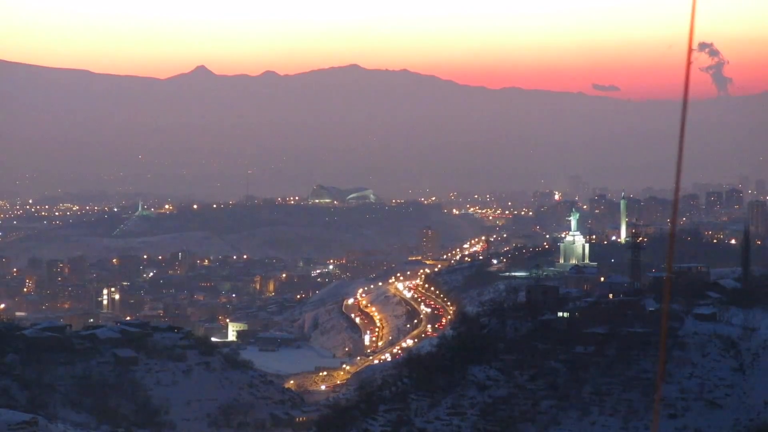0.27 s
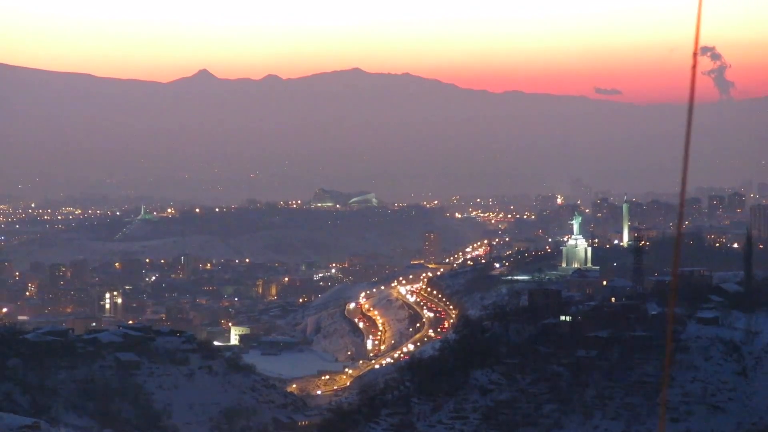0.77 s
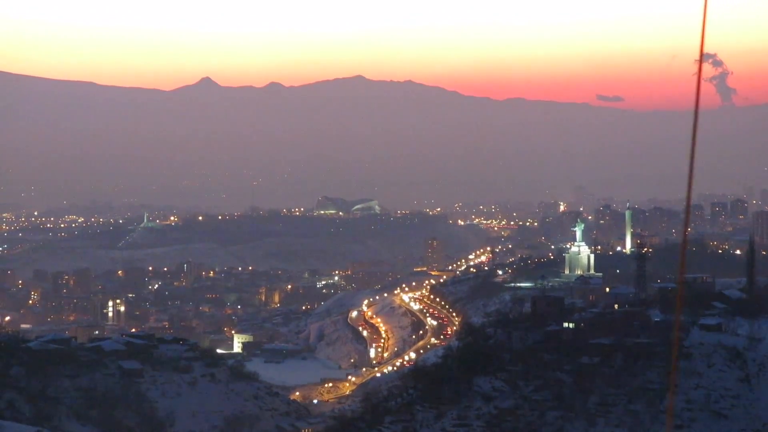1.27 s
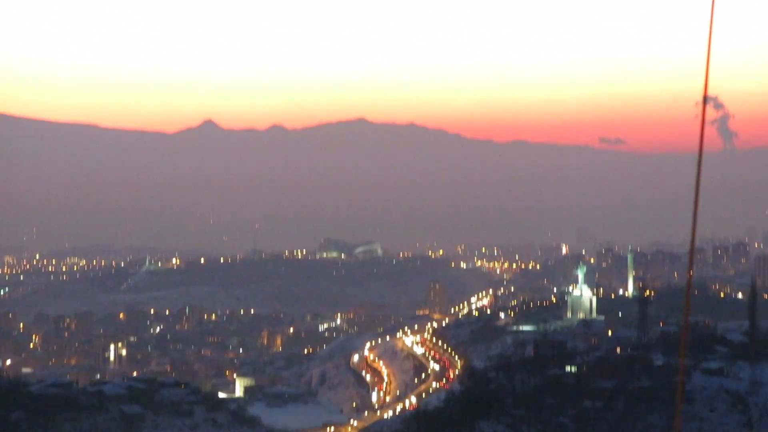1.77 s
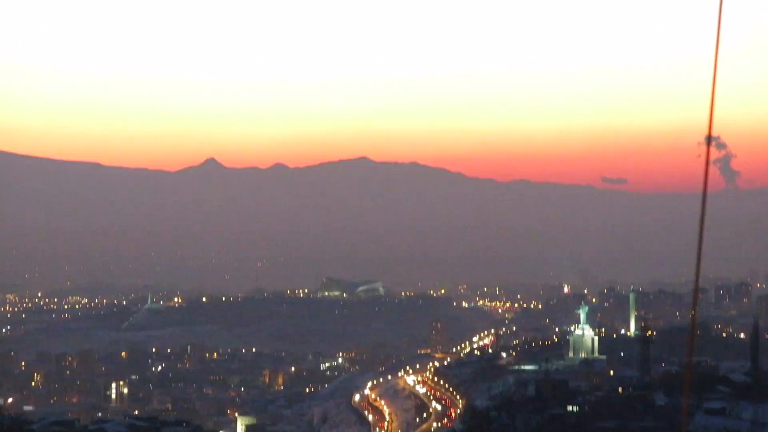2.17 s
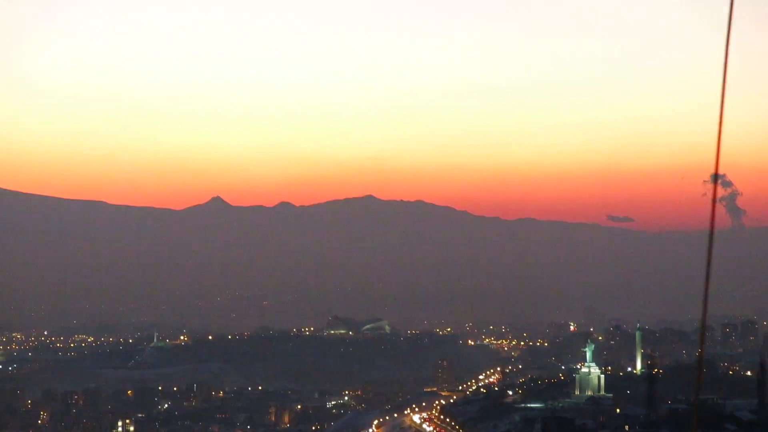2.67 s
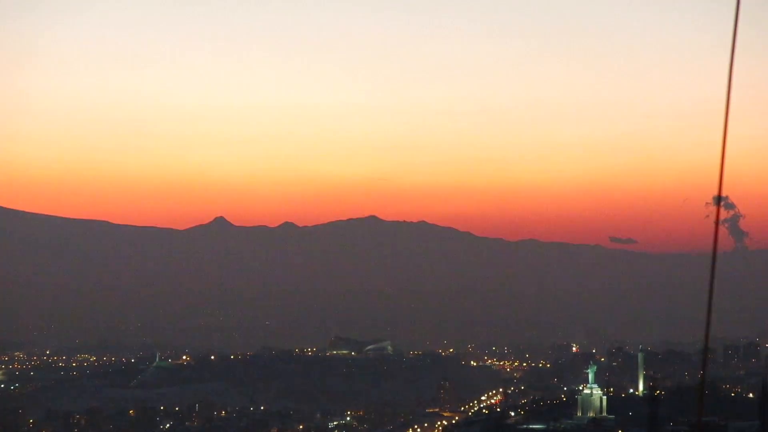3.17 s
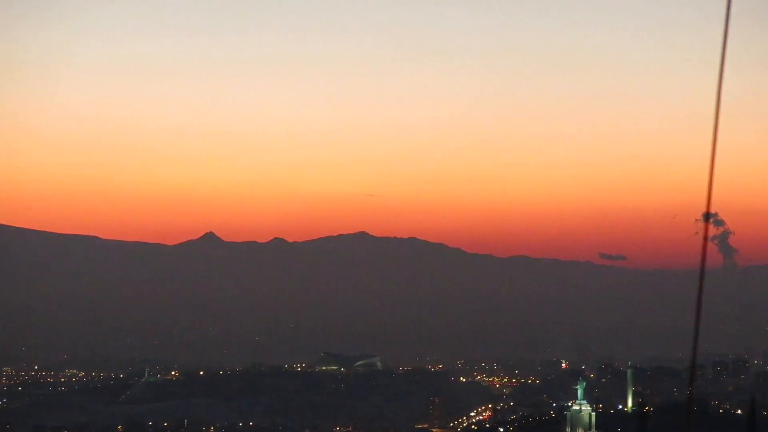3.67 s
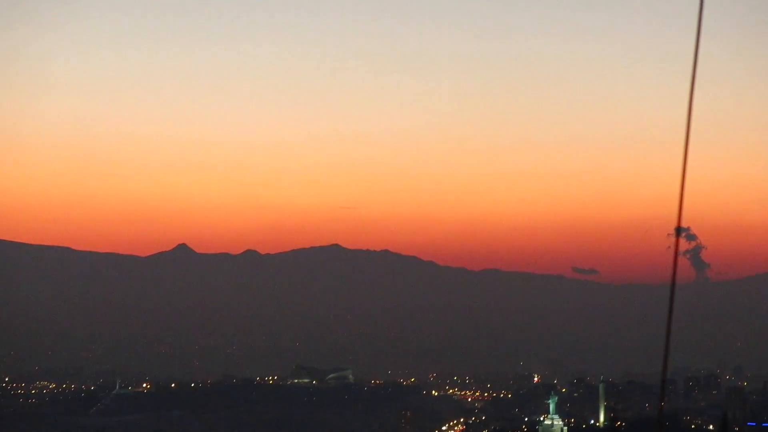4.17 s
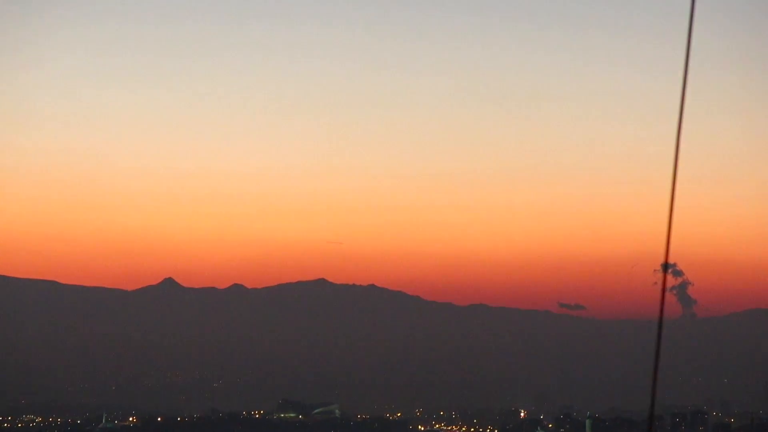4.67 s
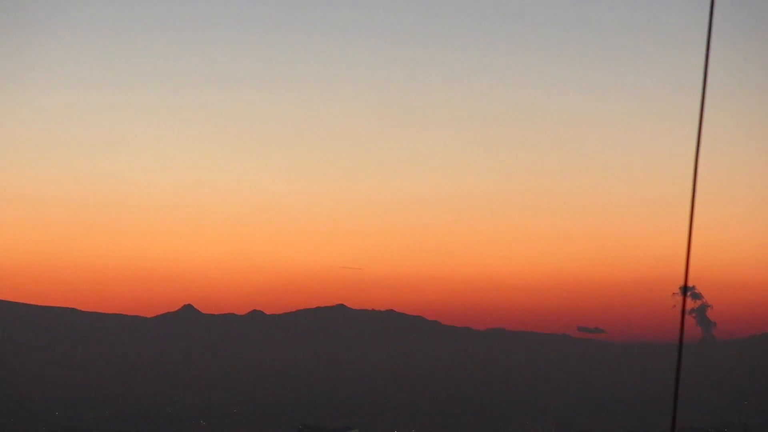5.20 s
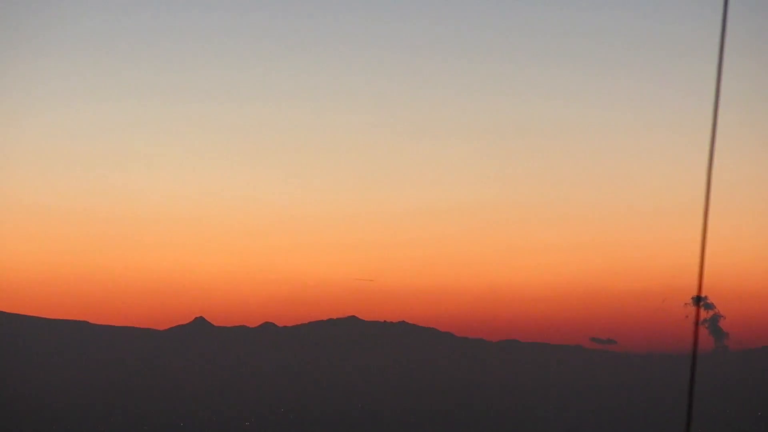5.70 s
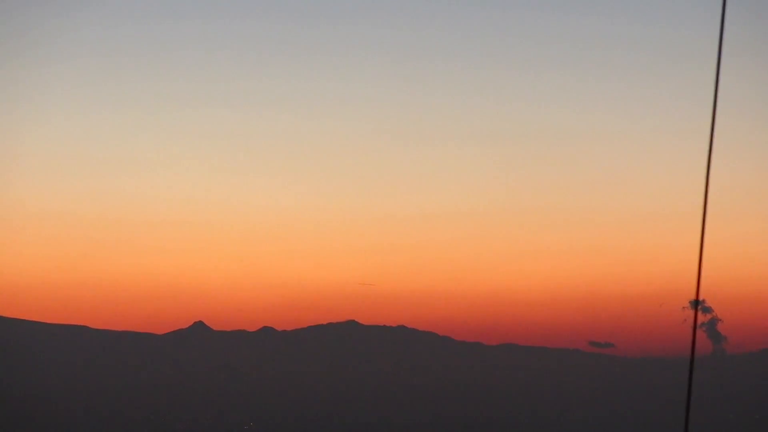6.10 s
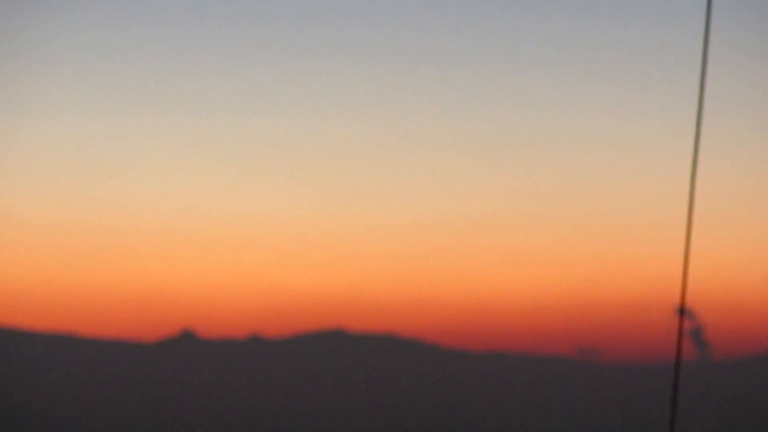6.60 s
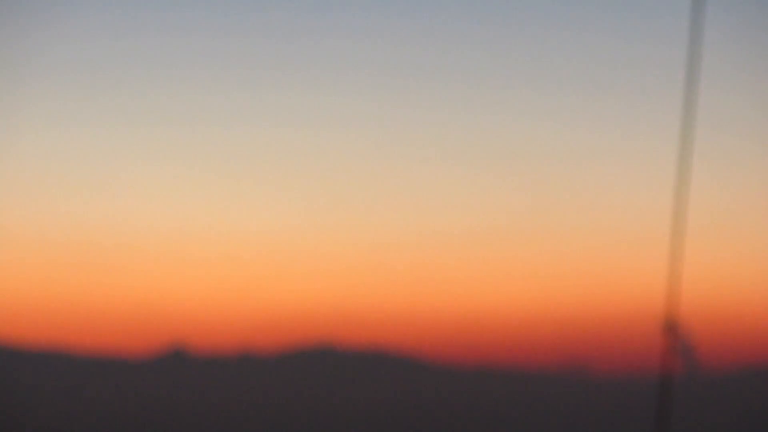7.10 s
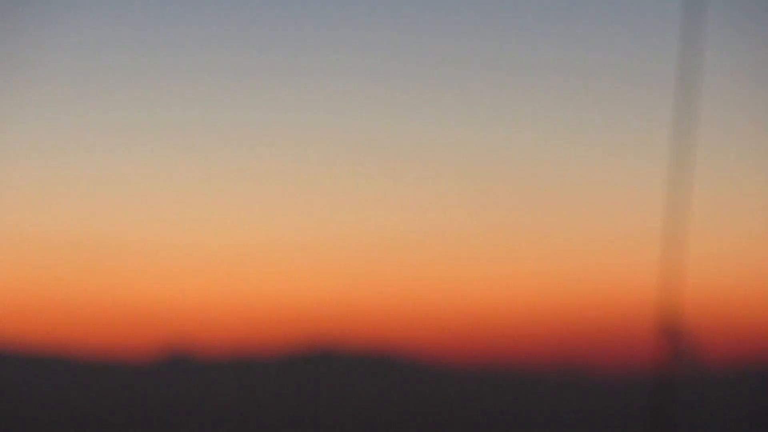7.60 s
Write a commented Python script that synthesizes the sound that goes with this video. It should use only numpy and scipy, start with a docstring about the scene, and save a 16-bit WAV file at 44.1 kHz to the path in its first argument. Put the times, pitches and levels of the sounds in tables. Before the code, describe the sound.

Many faraway engines and tyres merge into a low, wavering city drone, picked up outdoors from high ground with a little microphone hiss. Faint squeals and short clicks dot it. A closer diesel pulls, booms softly, chatters for a moment and drops back as its thin turbo whistle runs down. A few soft low puffs and a slight rumble follow while the traffic slowly fades away.

```python
"""A hillside above a city at dusk: countless engines merge into a low hum, their tyres into a roar.
Single exhaust notes and thin squeals surface and sink back. One nearer diesel accelerates, booms
through its pipe resonances, rattles briefly and eases off, while its turbocharger whistles up and
runs down. The microphone adds a faint hiss and whine. A few short clicks, blips and soft puffs dot
the scene, and a soft low rumble swells near the end as the second half fades out."""
import sys
import numpy as np
from scipy import signal
from scipy.fft import rfft, irfft, next_fast_len
from scipy.io import wavfile
from scipy.ndimage import uniform_filter1d, map_coordinates

SR = 44100
rng = np.random.default_rng(int(sys.argv[2]) if len(sys.argv) > 2 else 0)


def wav_out(sig):
    """Save sig, one row per channel (or a flat mono array), as 16-bit PCM at SR to the path in sys.argv[1]."""
    wavfile.write(sys.argv[1], SR, np.round(np.clip(np.atleast_2d(sig).T, -1, 1) * 32767).astype(np.int16))


N = 346185
TIME = np.arange(N) / SR

# Noise colours, each (frequency [Hz], relative spectral level [dB])
HISS_EQ = [(1500, -17), (2800, -1), (4500, 0), (5400, -1), (6500, -4), (9000, -8), (10500, -8.5),
           (12500, -10.5), (14000, -16), (15700, -24.5)]  # microphone hiss
LOW_SWELL_EQ = [(20, -25), (35, -12), (60, -3.5), (90, 4.5), (160, -22), (400, -61)]  # soft puffs and rumble
HUM_EQ = [(20, -47), (35, -32), (45, -22), (60, -10.5), (80, -8), (110, -5), (152, -2.5), (195, -3.5),
          (230, -10.5), (300, -22.5), (500, -65)]  # distant engines
ROAR_EQ = [(150, -41), (230, -10.5), (280, -5.5), (345, 1), (400, -2.5), (470, -1.5), (560, -2),
           (700, -6.5), (860, -6), (1000, -8), (1150, -12.5), (1300, -17.5), (1600, -29), (3000, -73)]  # distant tyres
NEAR_TYRES_EQ = [(700, -35), (1100, -2), (1400, 2), (1700, -3), (2000, -5.5), (2300, -10.5), (2700, -15.5),
                 (3200, -21.5), (5000, -34.5), (7000, -25.5), (12000, -38.5), (15700, -60)]  # brighter tyres of the nearest lane
RATTLE_EQ = [(2500, -26), (5000, -7), (8000, -2), (11500, -0.5), (13000, -12), (15500, -29)]  # the diesel's loose part
INTAKE_EQ = [(1200, -16), (2200, -3), (3500, 3.5), (5200, -2), (6200, 0), (7500, -3.5), (9500, -3.5),
             (12500, -12), (14000, -18), (15700, -27)]  # its air intake
BLOCK_EQ = [(120, -35), (200, -4.5), (240, 5), (300, -6.5), (600, -11), (720, -10), (870, 0), (980, -9),
            (1150, -18), (2000, -44)]  # its rough engine noise

# How alike the two channels' noise is: (frequency [Hz], likeness [0-1])
STEREO_LIKENESS = [(160, 1), (220, .985), (350, .94), (600, .82), (900, .76), (1400, .66), (2100, .72),
                   (4000, .54), (9000, .66), (14000, .35)]
# How far the left microphone port leads: (frequency [Hz], phase [rad])
LEFT_LEAD = [(150, 0), (350, 0.34), (600, 0.49), (900, 1), (1300, 1.84), (1700, 2), (2100, 1.02), (2800, 2),
             (4000, 1.26), (6000, 3.5), (8000, 5), (10000, 6.5), (14000, 8)]
# Shading by the microphone's housing: (frequency [Hz], left minus right [dB])
LEFT_TILT = [(110, 0), (170, -0.5), (240, -2), (380, -2), (700, -1), (1290, 3), (2380, 8), (4400, 1.5),
             (8120, -1), (15000, 3.5)]
# Four soft puffs, then a low rumble near the end: (start [s], end [s], level [dB])
LOW_SWELLS = [(2.26, 2.5, -39), (4.79, 4.89, -37.5), (5.45, 5.74, -36.5), (6.39, 6.53, -38.5),
              (6.6, 7.6, -42)]
# Short clicks and blips, among them a soft mid-range blip at 1.438 s and a faint high click at 7.06 s:
# (time [s], relative level [dB], low edge [Hz], high edge [Hz], ringing [0-1])
CLICK_CUES = [(0.7375, -46, 3000, 11000, .5), (1.438, -26, 500, 1600, 0.1), (1.5715, -49, 7020, 12000, .5),
              (1.7512, -24.7, 550, 2400, .05), (4.852, -27.5, 2150, 11800, .7),
              (4.502, -46, 10000, 12000, 1), (5.1374, -47, 6460, 11000, .5), (5.7699, -39, 7500, 12500, .5),
              (5.884, -48, 6500, 13000, .5), (7.06, -45, 7500, 12500, .5)]
# The ring in each click: (frequency [Hz], level [dB], time to fall 60 dB [s])
CLICK_MODES = [(1400, 9, 0.0047), (2330, 2.5, 0.015), (3300, -4.5, .008), (3900, 2, 0.0081),
               (5600, -8, 0.0046), (7800, -1.5, .004), (9250, -11, .004), (11150, -7, .003)]
# The flow of vehicles: (time [s], hum level [dB], roar level [dB])
TRAFFIC_FLOW = [(0, -34.5, -32.5), (0.7, -35.2, -35), (1.25, -34.5, -36.5), (2.0, -36, -36.5),
                (2.4, -33.5, -33.5), (3.1, -31, -32.5), (3.8, -35, -34), (4.1, -34.5, -35),
                (4.9, -35.5, -36), (5.6, -34.5, -36), (6.2, -35, -36.5), (7.7, -34, -35.5)]
# Brief surges and lulls in it: (start [s], end [s], hum gain [dB], roar gain [dB])
TRAFFIC_SURGES = [(.48, .76, -1.5, 4.2), (.74, .95, -0.5, -1), (1.137, 1.337, -4, 0),
                  (3.93, 4.14, -2.5, -3.5), (4.17, 4.35, -0.5, 1), (4.626, 4.747, 5.5, 2.5),
                  (4.742, 4.86, 3.5, 3.5), (4.88, 5.03, 1.5, -1), (5.12, 5.327, -3, 1)]
# Brightness of the tyre roar: (time [s], upper band gain [dB])
ROAR_BRIGHTNESS = [(0, -0.2), (1.6, 1.2), (3.2, 0), (4.6, -0.2), (5.6, -1.5), (7.7, 0.5)]
# Tyres of the nearest lane: (time [s], level [dB])
NEAR_LANE = [(0, -44), (.4, -41.5), (.8, -46), (1.1, -46), (1.45, -46), (1.95, -45.5), (2.5, -43.5),
             (3.1, -42), (3.55, -40), (3.95, -44.5), (4.4, -45.5), (5.1, -46), (6.2, -47), (7.7, -47)]
# Single engines in the hum: (start [s], end [s], start pitch [Hz], end pitch [Hz], relative level [dB])
DRONE_CUES = [(-0.08, 0.2, 159, 164.3, -30.5), (0.318, 0.678, 164, 146.3, -30.8),
              (-0.05, 0.47, 125.7, 122, -35), (0.017, 0.323, 443, 463.5, -33),
              (0.071, 1.315, 336, 349.4, -42), (1.49, 3.575, 344, 347.8, -43), (2.2, 2.582, 81, 85, -38.5),
              (2.36, 2.597, 218.7, 201, -34.5), (1.5, 2.6, 150, 145.4, -46), (3.5, 4.6, 158, 163.5, -42),
              (3.996, 4.45, 890, 897, -46), (4.663, 4.94, 156.4, 154.2, -32), (4.6, 4.9, 190.2, 194.8, -37),
              (4.918, 5.452, 158, 146.8, -32.7), (5.375, 5.68, 146, 137, -31.5),
              (5.6, 7.9, 168.1, 165, -39.5), (5.7, 6.6, 148.9, 140.5, -37)]
# Thin squeals: (start [s], end [s], start pitch [Hz], end pitch [Hz], width [Hz], level [dB])
SQUEAL_CUES = [(1.29, 1.45, 11950, 12100, 400, -68.5), (1.65, 1.81, 12300, 10800, 2000, -64.5),
               (2.215, 2.45, 10100, 9900, 520, -58.8), (2.43, 2.72, 10050, 9600, 600, -63.3),
               (3.05, 3.26, 9100, 9300, 400, -63.5), (3.82, 4.09, 6020, 5980, 150, -67),
               (.36, .62, 2020, 2020, 40, -57), (3.555, 3.625, 2000, 2005, 60, -47),
               (3.63, 3.72, 2005, 2000, 50, -53), (3.1, 4.2, 2490, 2450, 220, -58),
               (3.4, 4.6, 2030, 1950, 260, -55)]
# Blows of the loose part: (time [s], level [dB])
RATTLE_HITS = [(3.295, -51), (3.326, -47), (3.336, -50), (3.354, -44.5), (3.384, -47), (3.413, -52),
               (3.443, -43), (3.467, -45), (3.497, -50), (3.506, -49), (3.517, -49), (3.527, -45),
               (3.548, -53), (3.581, -52)]
# The intake draws harder in waves: (start [s], end [s], gain [dB])
INTAKE_SWELLS = [(2.3, 2.72, 4.5), (3.4, 3.64, 2.5), (3.82, 4.06, 2)]
# Pipe resonances met by exhaust orders 1-4: (peak [dB], crank speed at peak [Hz], half width [Hz])
PIPE_BOOMS = [(-48, 37.4, 2.5), (-34.5, 36.7, 4.1), (-34.5, 33.5, 3.3), (-31.5, 35.7, 2.7)]

THROTTLE_ON_S, THROTTLE_OFF_S = 2.35, 3.96  # the diesel's one pull
TOP_HZ = 15780  # band limit of the mix


def amp(db):
    """Decibels to gain."""
    return 10 ** (np.asarray(db) / 20)


def unit(x):
    """x at rms 1."""
    return x / np.sqrt(np.mean(x ** 2) + 1e-20)


def along(points, hz):
    """(frequency [Hz], value) points read on a log axis."""
    freqs, values = np.transpose(points)
    return np.interp(np.log(hz + 1), np.log(freqs + 1), values)


def curves(rows):
    """One automation curve for each column after the time."""
    times, *columns = np.transpose(rows)
    return [np.interp(TIME, times, column) for column in columns]


def ramp(start, length):
    """A straight rise from 0 to 1."""
    return np.clip((TIME - start) / length, 0, 1)


def swell(start, end):
    """A rounded rise and fall between two times."""
    return np.sin(np.pi * ramp(start, end - start))


def wobble(rate):
    """A smooth random curve, rate knots a second."""
    return map_coordinates(rng.standard_normal(int(N * rate / SR) + 4), [TIME * rate])


def filtered(x, response):
    """x through a complex frequency response."""
    size = next_fast_len(N + 8192)
    return irfft(rfft(x, size) * response(np.fft.rfftfreq(size, 1 / SR)), size)[..., :N]


def tone(hz):
    """A sine of rms 1 that follows a pitch curve."""
    return np.sqrt(2) * np.sin(2 * np.pi * np.cumsum(hz) / SR)


def breathy_tone(hz, width_hz):
    """A narrow band of stereo noise, rms 1, around a pitch curve."""
    blur = filtered(rng.standard_normal((2, 2, N)), lambda f: 1 / (1 + (2 * f / width_hz) ** 2))
    phase = 2 * np.pi * np.cumsum(hz) / SR
    return unit(blur[0] * np.cos(phase) + blur[1] * np.sin(phase))


def rush(eq, patchy_db):
    """Coloured stereo noise of rms 1 with drifting patches of gain, wider in the treble."""
    def mid_side(hz):
        width = np.arccos(np.clip(along(STEREO_LIKENESS, hz), 0, 1)) / 2
        return amp(along(eq, hz)) * [np.cos(width), np.sin(width)]

    spectra = signal.stft(rng.standard_normal((2, N)), nperseg=1024)[2]
    patches = uniform_filter1d(rng.standard_normal(spectra.shape[1:]), size=4, axis=0)  # over frequency
    patches = uniform_filter1d(patches, size=18, axis=1)  # over time
    noise = signal.istft(spectra * amp(patchy_db * unit(patches)), nperseg=1024)[1][:, :N]
    mid, side = filtered(noise, mid_side)
    return unit(np.array([mid + side, mid - side]))


def low_swells():
    """Bass noise rises in four brief puffs, then in a soft low rumble near the end."""
    envelope = sum(amp(db) * swell(start, end) for start, end, db in LOW_SWELLS)
    return envelope * rush(LOW_SWELL_EQ, patchy_db=2.5)


def clicks(snap_db=12, crackle_db=-5, crackle_t60=0.023):
    """Each click or blip is one impulse with a brief ring and crackle, confined to its own band."""
    out = np.zeros((2, N))
    t = np.arange(SR // 10) / SR
    snap = amp(snap_db) * (t == 0)
    ring = sum(amp(db - 60 * t / t60) * np.sin(2 * np.pi * hz * t) for hz, db, t60 in CLICK_MODES)
    for start, db, low_hz, high_hz, ringing in CLICK_CUES:
        crackle = amp(crackle_db - 60 * t / crackle_t60) * rng.standard_normal((2, len(t)))
        band = signal.butter(5, [low_hz, high_hz], "bandpass", fs=SR, output="sos")
        click = signal.sosfilt(band, snap + ringing * (ring + crackle))
        at = round(start * SR)
        out[:, at:at + len(t)] += amp(db + 15) * click / np.linalg.norm(click)
    return out


def traffic(crossover_hz=650):
    """The bed: engines merge into a hum, tyres into a roar; moving air makes both waver."""
    hum_db, roar_db = curves(TRAFFIC_FLOW)
    for start, end, hum_gain_db, roar_gain_db in TRAFFIC_SURGES:
        hum_db += hum_gain_db * swell(start, end)
        roar_db += roar_gain_db * swell(start, end)
    near_db, = curves(NEAR_LANE)
    bright_db, = curves(ROAR_BRIGHTNESS)
    air = wobble(7)
    hum = amp(hum_db + 0.31 * wobble(5.5)) * rush(HUM_EQ, patchy_db=0.2)
    tyres = rush(ROAR_EQ, patchy_db=0.73)
    lows = filtered(tyres, lambda hz: 1 / (1 + (hz / crossover_hz) ** 6))
    roar = amp(roar_db + 0.3 * air) * (lows + amp(bright_db) * (tyres - lows))
    near = amp(near_db + 0.67 * air) * rush(NEAR_TYRES_EQ, patchy_db=1.7)
    return hum + roar + near


def drones(waver_db=0.84):
    """Exhaust notes of single vehicles surface, drift in pitch and sink back."""
    out = np.zeros(N)
    for start, end, from_hz, to_hz, db in DRONE_CUES:
        pitch = np.interp(TIME, [start, end], [from_hz, to_hz]) * (1 + 0.008 * wobble(25))
        out += amp(db - 1.5 + waver_db * wobble(9.2)) * swell(start, end) * tone(pitch)
    return out


def squeals(flutter_hz=13.5, depth_db=3.5):
    """Faint high tones that catch quickly, flutter roughly and slide a little."""
    out = np.zeros((2, N))
    for start, end, from_hz, to_hz, width_hz, db in SQUEAL_CUES:
        flutter_db = -depth_db * np.cos(2 * np.pi * flutter_hz * (TIME - start)) + 1.5 * wobble(90)
        pitch = np.interp(TIME, [start, end], [from_hz, to_hz])
        envelope = np.sqrt(np.abs(swell(start, end)))
        out += amp(db + flutter_db) * envelope * breathy_tone(pitch, width_hz)
    return out


def pull():
    """Timing of the diesel's pull: (time until it starts [s], progress [0-1], time since it ended [s])."""
    progress = ramp(THROTTLE_ON_S, THROTTLE_OFF_S - THROTTLE_ON_S)
    return np.maximum(THROTTLE_ON_S - TIME, 0), progress, np.maximum(TIME - THROTTLE_OFF_S, 0)


def throttle(open_s=0.046, close_s=0.28):
    """A gate that opens for the pull and closes after it."""
    return ramp(THROTTLE_ON_S, open_s) * (1 - ramp(THROTTLE_OFF_S, close_s))


def rattle(t60=0.036):
    """Near top revs something loose chatters unevenly, each blow a short bright burst."""
    blows = sum((TIME >= start) * amp(db - 60 * np.maximum(TIME - start, 0) / t60)
                for start, db in RATTLE_HITS)
    return blows * rush(RATTLE_EQ, patchy_db=4.0)


def turbo(rest_hz=8530, boost_hz=13350, coast_hz=5700, coast_s=0.57, lag_s=0.36):
    """After a lag the rotor sings and spins up, smeared into hiss; off the throttle it coasts down."""
    _, progress, after = pull()
    driven_hz = rest_hz + (boost_hz - rest_hz) * np.sin(np.pi / 2 * progress) ** 3
    rotor_hz = coast_hz + (driven_hz - coast_hz) / (1 + after / coast_s)
    octaves_from_rest = np.abs(np.log2(rotor_hz / rest_hz))
    level_db = -66.2 - 1.2 * after - 18 * octaves_from_rest
    whistle = breathy_tone(rotor_hz, width_hz=380)
    smear = throttle() * amp(5.5) * breathy_tone(rotor_hz, width_hz=1100)
    envelope = ramp(THROTTLE_ON_S, lag_s) * (1 - ramp(start=5.8, length=0.3))
    return envelope * amp(level_db + 1.8 * wobble(17)) * (whistle + smear)


def intake(peak_torque_s=3.62, fall_db_per_s=8):
    """Air rushes into the engine in waves, loudest around peak torque."""
    level_db = -50.6 - fall_db_per_s * np.abs(TIME - peak_torque_s)
    level_db += sum(db * swell(start, end) for start, end, db in INTAKE_SWELLS)
    return throttle() * amp(level_db + 1.2 * wobble(150)) * rush(INTAKE_EQ, patchy_db=1.5)


def crank(idle_hz=28.16, rev_hz_per_s=6.6, sag_hz_per_s=10):
    """Crankshaft speed [Hz]: it climbs under throttle and sags back to idle."""
    _, progress, after = pull()
    climb_hz = rev_hz_per_s * (THROTTLE_OFF_S - THROTTLE_ON_S) * progress
    return idle_hz + np.maximum(climb_hz - sag_hz_per_s * after, 0)


def diesel(rise_db_per_s=10.5, fall_db_per_s=19):
    """Under load the low exhaust orders boom through the pipe's resonances, over rough engine noise."""
    before, _, after = pull()
    crank_hz = crank() * (1 + 0.0037 * wobble(11))
    exhaust = np.zeros(N)
    for order, (db, peak_hz, width_hz) in enumerate(PIPE_BOOMS, 1):
        resonance = 1 / (1 + ((crank_hz - peak_hz) / width_hz) ** 2)
        exhaust += amp(db + 1.5 * wobble(12)) * resonance * tone(order * crank_hz)
    load = throttle(open_s=0.26, close_s=0.12)
    block_db = -39 - rise_db_per_s * before - fall_db_per_s * after
    return load * exhaust + amp(block_db) * rush(BLOCK_EQ, patchy_db=1.5)


def scene():
    """The town reaches the microphone from the left, shaded by its housing; small details sit on top."""
    def ports(hz):
        sides = np.array([[0.5], [-0.5]])
        return amp(sides * along(LEFT_TILT, hz)) * np.exp(1j * sides * along(LEFT_LEAD, hz))

    town = traffic() + drones() + diesel() + rattle() + turbo() + intake() + squeals()
    hiss = amp(-56) * rush(HISS_EQ, patchy_db=1.5)
    whine = amp(-82.5) * tone(hz=np.full(N, 15734))
    return filtered(town + hiss, ports) + low_swells() + clicks() + whine


def record(dry):
    """A long straight fade, cut to silence just before its end, then the band limit."""
    fade = 1 - ramp(start=4.05, length=3.8)
    cut = 1 - ramp(start=7.75, length=0.01)
    return filtered(dry * fade * cut, lambda hz: hz < TOP_HZ)


dry = scene()
out = record(dry)
wav_out(out)
```